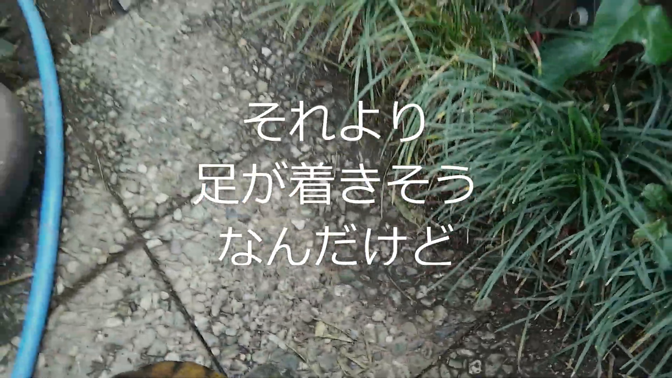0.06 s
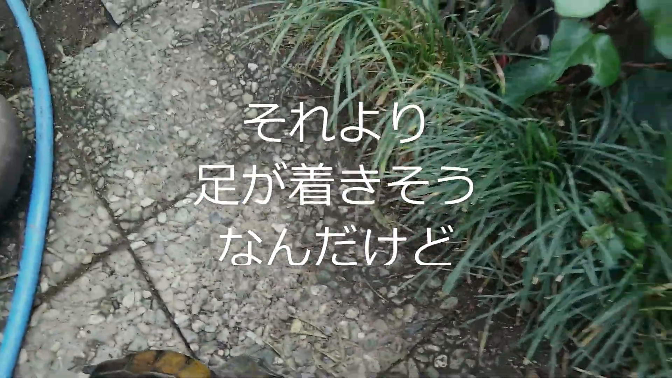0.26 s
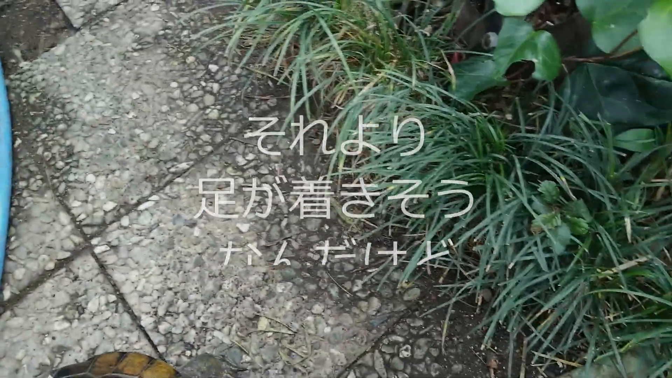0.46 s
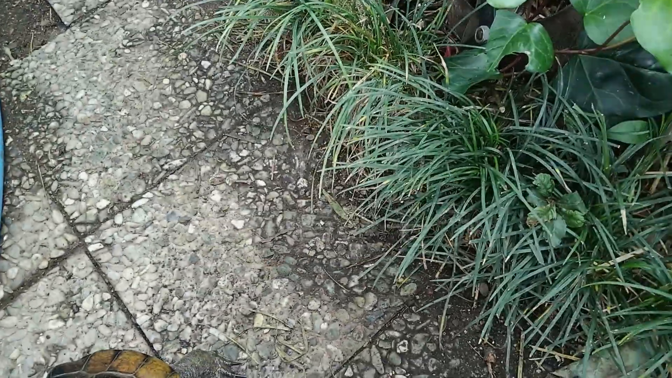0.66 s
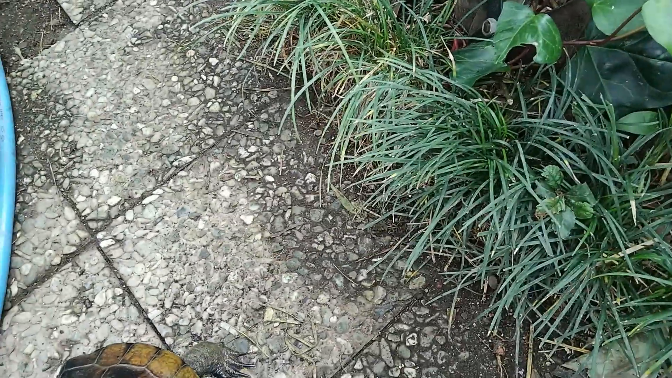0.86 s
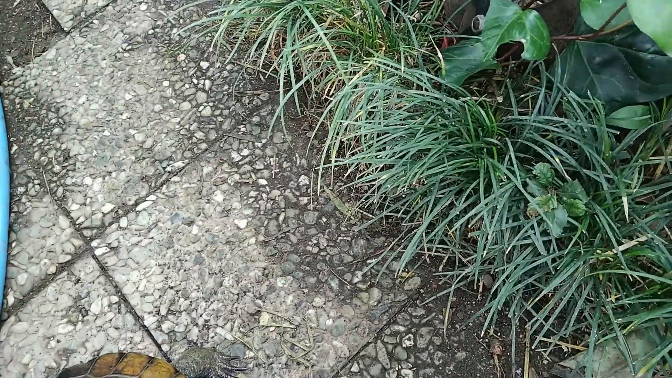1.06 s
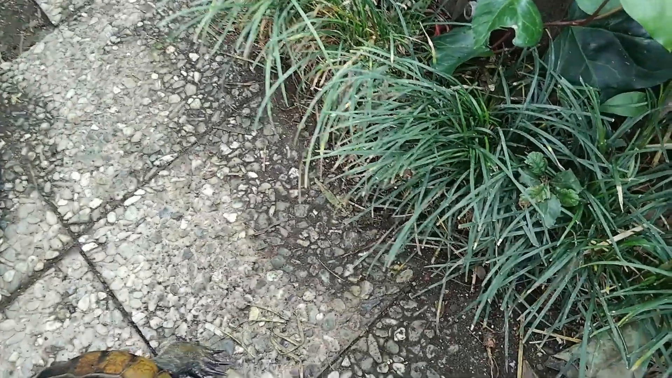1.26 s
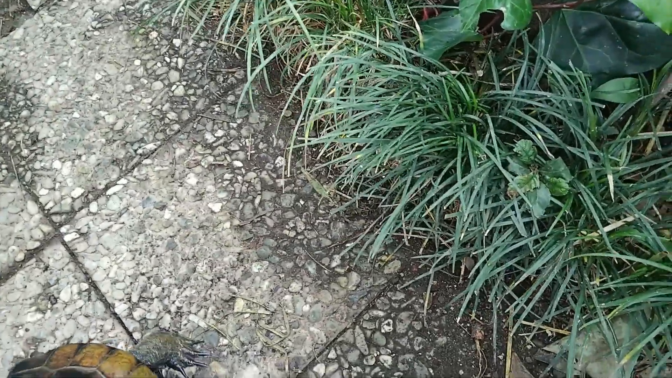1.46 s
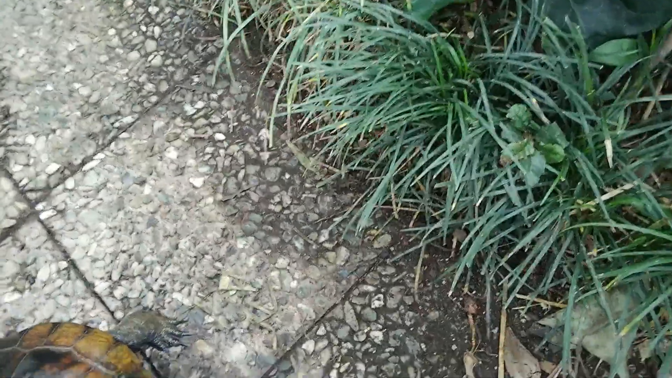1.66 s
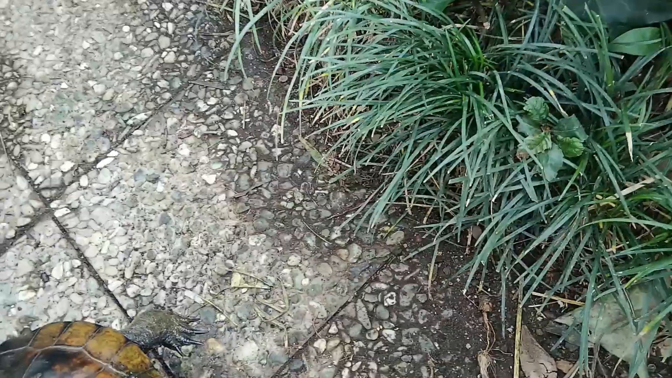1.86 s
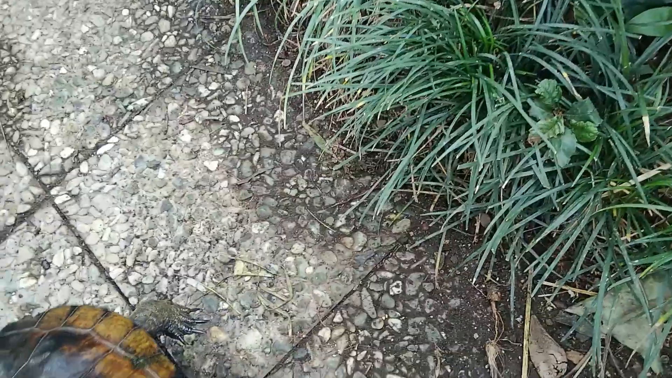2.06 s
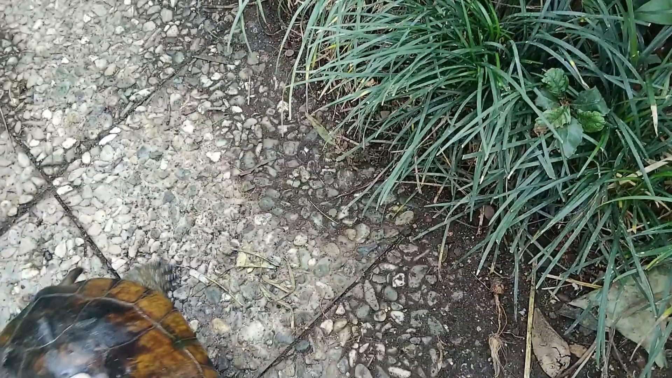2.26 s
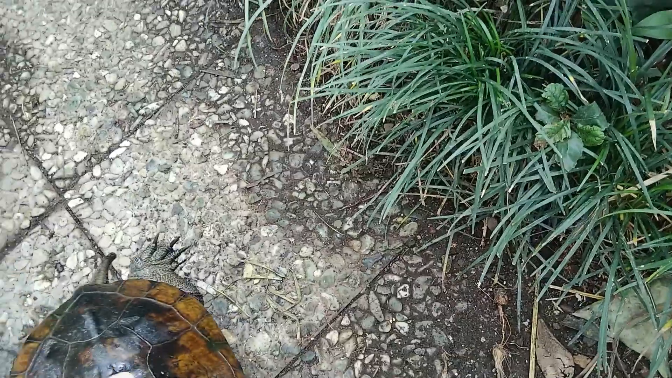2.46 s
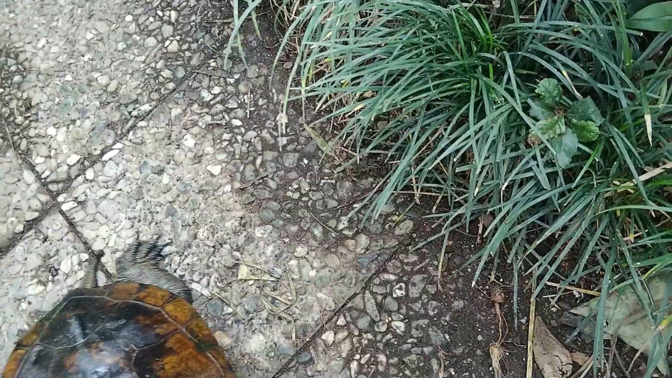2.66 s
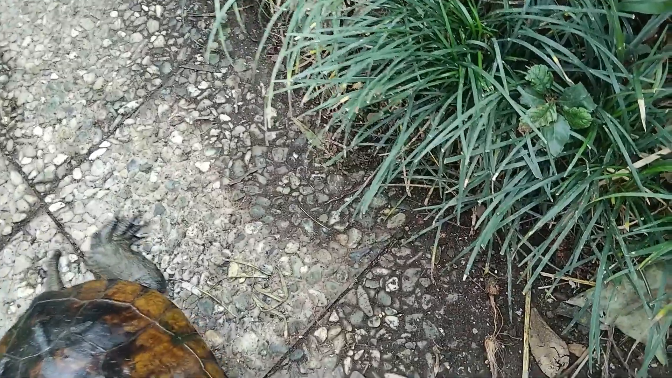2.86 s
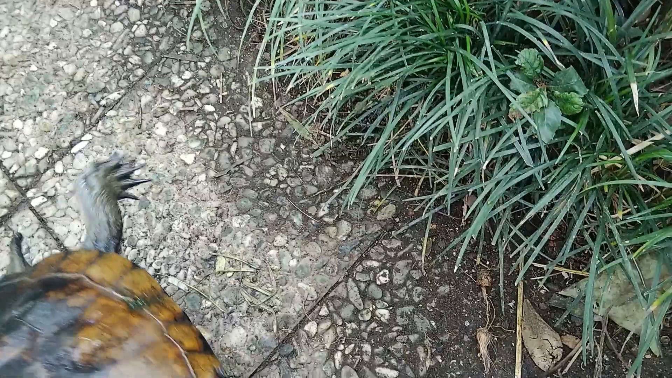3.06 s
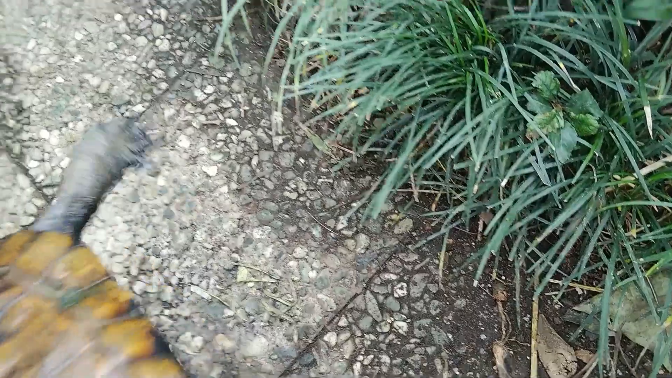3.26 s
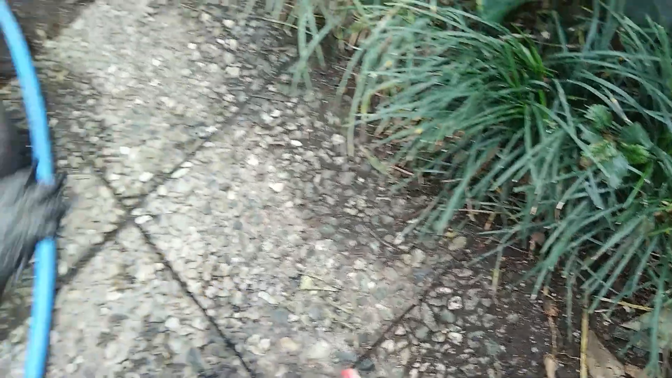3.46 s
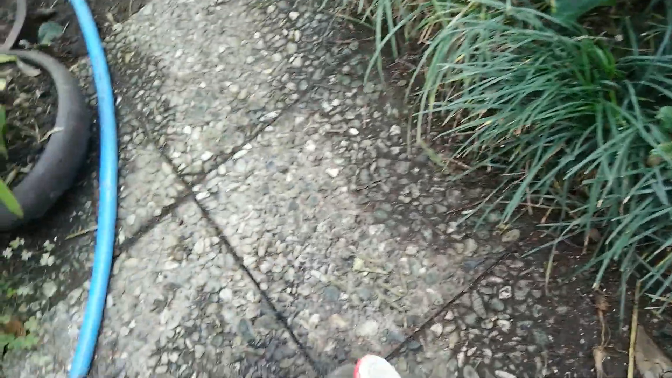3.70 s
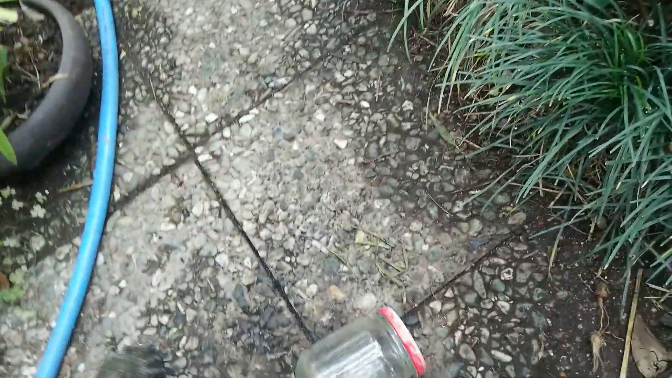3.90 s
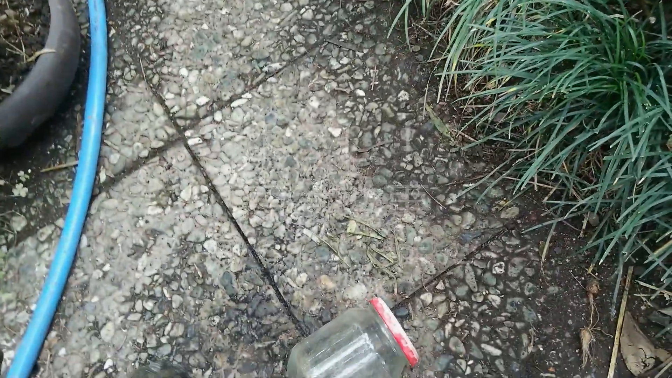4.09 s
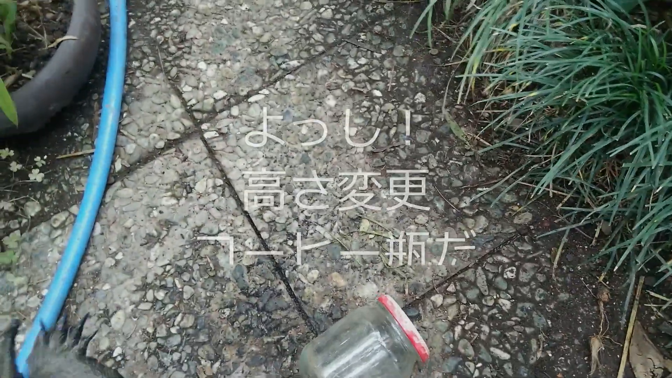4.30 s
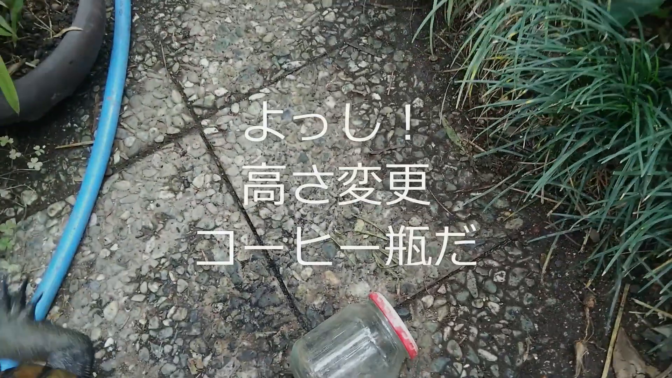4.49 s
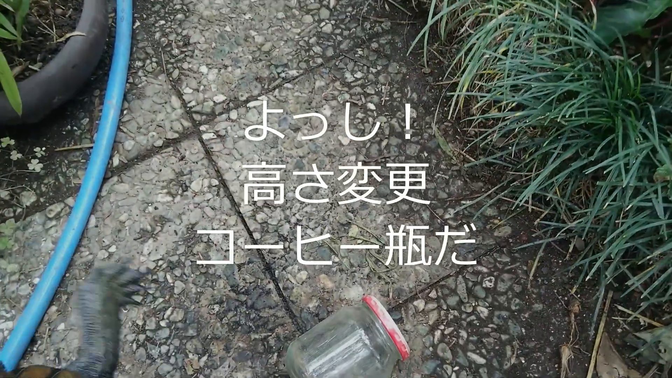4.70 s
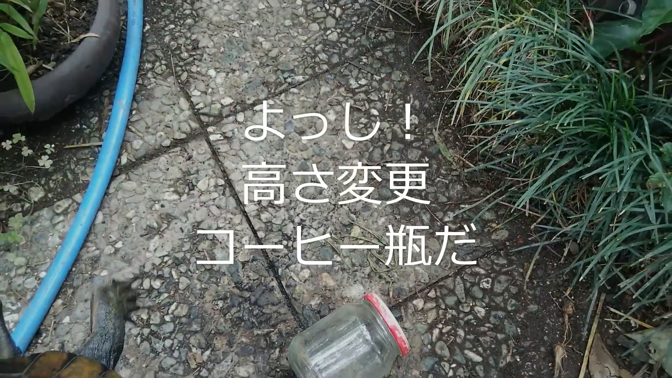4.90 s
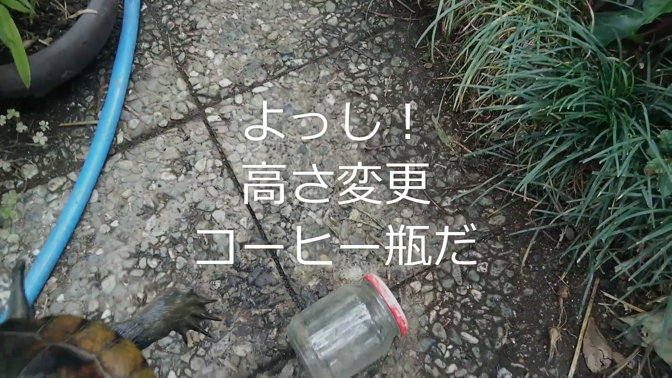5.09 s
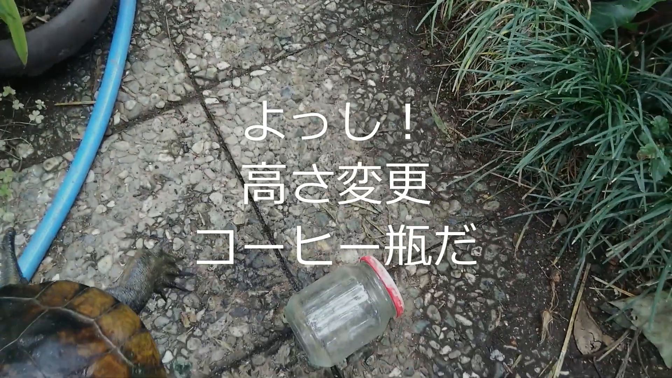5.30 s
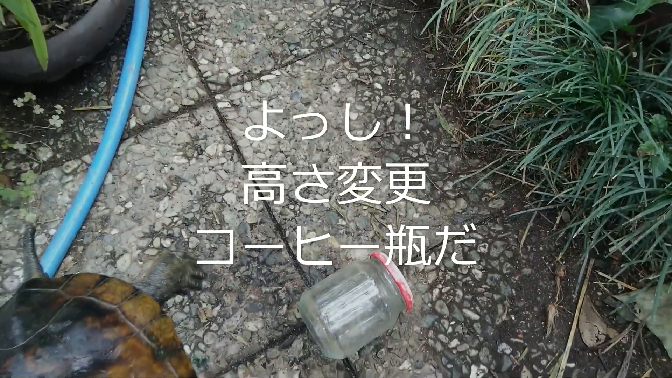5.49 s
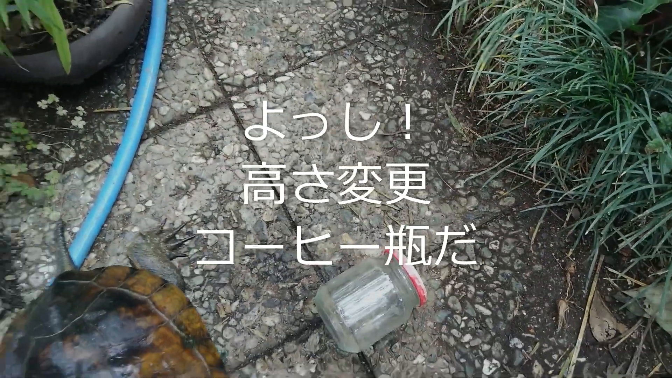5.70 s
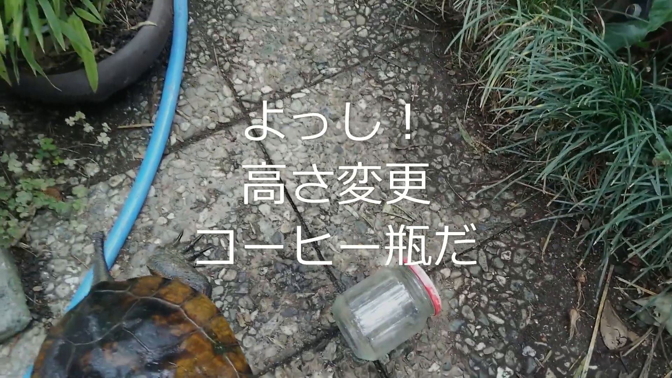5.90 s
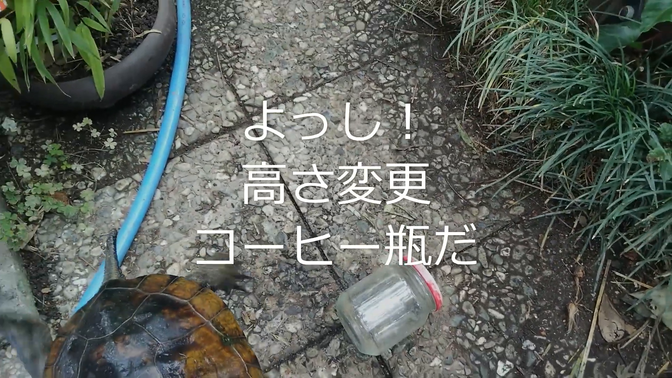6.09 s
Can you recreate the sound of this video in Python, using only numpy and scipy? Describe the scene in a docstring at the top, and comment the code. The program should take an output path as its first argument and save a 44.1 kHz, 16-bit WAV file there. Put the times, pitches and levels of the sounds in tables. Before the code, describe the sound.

A calm garden bed of soft hiss and low rumble, with a very faint steady motor hum and whine far off. At about 0.8 s a loud, hollow, woody-glassy knock lands close by, bouncing weakly within a tenth of a second, with faint touches and a scuff until 1.1. Then quiet, with one tiny tick near 1.6 and a bump and tick around 3.1. From 3.35 an empty glass jar touches, then clatters on stone: hard knocks at 3.42 and 3.47, a cluster at 3.6, a sharp one at 3.68. The level drops very briefly at 3.78, and the motor's tone shifts slightly. Knocks and clinks resume at 3.8, a crisp one at 4.0, fading into scrapes and light touches by 4.3. Soft scuffs follow; gritty ticks come at 5.9, then low handling bumps and a faint knock near 6.0. Short yard reflections.

```python
"""A jar tips over on garden paving

A hollow knock bounces, then an empty glass jar clatters, clinks and scrapes to rest on stone.
Blows are dying sines with noisy chatter; ticks, scrapes, soft thumps and bumps are shaped noise.
Outdoor hiss with a low rumble is noise too; a distant motor is a stack of faint sines.
The level dips briefly once, and the motor's balance of pitches changes there."""
import sys
import numpy as np
from scipy import signal
from scipy.io import wavfile
from scipy.ndimage import uniform_filter1d

SR = 44100
rng = np.random.default_rng(int(sys.argv[2]) if len(sys.argv) > 2 else 0)


def persist_wave(psi):
    """Save psi, clipped to +-1, as 16-bit WAV."""
    counts = np.round(np.clip(psi, -1, 1) * 32767).astype(np.int16)
    wavfile.write(sys.argv[1], SR, np.atleast_2d(counts).T)


N = 271126  # length in samples
DIP_S = 3.777  # middle of the brief dip in level


def gain_of(db):
    """Turn decibels into a factor for the wave."""
    return 10 ** (np.asarray(db) / 20)


def evened(x):
    """Scale to an average (RMS) strength of 1."""
    return x / np.sqrt(np.mean(x ** 2) + 1e-20)


def read(points, hz):
    """Read a curve of (pitch, value) points on a logarithmic pitch scale."""
    point_hz, value = np.transpose(points)
    return np.interp(np.log(hz + 1), np.log(point_hz + 1), value)


def add(mix, s, sound):
    """Lay a sound into the mix, starting at s seconds."""
    part = mix[round(s * SR):][:len(sound)]
    part += sound[:len(part)]


def band(x, lo_hz, hi_hz):
    """Keep the pitches between two limits, with gentle slopes outside."""
    limits = [lo_hz, min(hi_hz, SR / 2.2)]
    return signal.sosfilt(signal.butter(2, limits, "bandpass", fs=SR, output="sos"), x)


def ring(modes, tilt_db=0, spread_db=3.0, detune=0):
    """Dying sines; a hard blow favours the high modes, and each blow differs at random."""
    hz, db, t60 = np.transpose(modes)[..., None]
    t = np.arange(round(.25 * SR)) / SR
    draw = rng.standard_normal((2, *hz.shape))
    db = db + tilt_db * np.log2(hz / hz.mean()) + spread_db * draw[0]
    sines = np.sin(2 * np.pi * hz * (1 + detune * draw[1]) * t)
    return (gain_of(db - 60 * t / t60) * sines).sum(0)


def struck(sound, size):
    """The contact lasts a moment (size samples), which rounds the start; peak 1."""
    pushed = np.convolve(sound, np.hanning(size))[:len(sound)]
    return pushed / abs(pushed).max()


def swelling(sound, rise_s):
    """A struck body takes a moment to reach its full ring; peak 1."""
    rise = np.clip(np.arange(len(sound)) / SR / rise_s, 0, 1)
    grown = sound * np.sin(np.pi / 2 * rise) ** 2
    return grown / abs(grown).max()


def chatter(sound, grit_db, t60):
    """The body keeps chattering on the pebbles: dying noise strikes it again and again."""
    t = np.arange(round(.12 * SR)) / SR
    grit = rng.standard_normal(len(t)) * gain_of(-60 * t / t60) * np.clip(t / 0.0014, 0, 1)
    rattle = signal.fftconvolve(sound, grit / np.linalg.norm(grit))[:len(sound)]
    return sound + gain_of(grit_db) * rattle


def crack(decay_s):
    """The short wide snap of stone against a hard edge: fading noise."""
    t = np.arange(round(0.0089 * SR)) / SR
    return band(rng.standard_normal(len(t)), 3500, 7400) * np.exp(-t / decay_s)


def air():
    """Outdoor hiss and rumble: noise with drifting patches and a flicker, most in the treble."""
    # how strong the noise is at each pitch: pitch_hz [Hz], density_db [relative dB per Hz]
    air_colour = [(25, -34), (45, 7), (62, 10), (120, -9), (170, -9), (400, -9), (900, -9.5), (1200, -13.5),
                  (2400, -7), (3200, -13.5), (6500, -11.5), (8000, -26), (10500, -35), (16500, -40.5)]
    # slow swell of the hiss, in full only in the treble: time_s [s], swell_db [dB]
    air_swell = [(0.0, -1.1), (1.8, -1.1), (2.9, 0.6), (3.7, 1), (4.33, -1), (5.3, -0.4), (5.75, -3),
                 (6.04, 1.7), (6.15, 2)]
    level_db = -52.5
    frames, hz = N // 256 + 5, np.fft.rfftfreq(1024, 1 / SR)
    a, b, patches = rng.standard_normal((frames, 513, 3)).T
    # smooth across pitch, then across time
    patches = uniform_filter1d(uniform_filter1d(patches, size=16, axis=0), size=10, axis=1)
    patches = evened(patches)
    flicker = evened(uniform_filter1d(rng.standard_normal(frames), size=4))
    swell_db = np.interp(np.arange(frames) * 256 / SR, *np.transpose(air_swell))
    treble_share = np.clip(hz / 4500, .05, 1)[:, None]
    moving_db = 1.4 * patches + treble_share * (swell_db + 1.8 * flicker)
    field_db = read(air_colour, hz)[:, None] + moving_db
    noise = signal.istft((a + 1j * b) * gain_of(field_db), nperseg=1024, noverlap=768)[1][:N]
    return gain_of(level_db) * evened(noise)


def motor():
    """Steady faint sines whose strength wavers on the way through the air."""
    # lines of the motor, one of them a whine between the whole multiples:
    # multiple [times base_hz], before_db [dB before the dip], after_db [dB after its middle]
    motor_lines = [(1, -70, -66), (3, -77, -76), (4, -79, -76), (4.562, -73, -72), (8, -72, -84),
                   (9, -76, -80), (12, -77, -77), (13, -76, -82), (15, -80, -78), (18, -84, -75),
                   (20, -78, -78), (23, -75, -79), (24, -77, -77)]
    base_hz = 116.3
    multiple, before_db, after_db = np.transpose(motor_lines)[..., None]
    t, draw = np.arange(N) / SR, rng.random((3, *multiple.shape))
    db = np.where(t < DIP_S, before_db, after_db)
    waver_db = 3 * np.sin(2 * np.pi * ((.4 + draw[0]) * t + draw[1]))
    lines = np.sin(2 * np.pi * (multiple * base_hz * t + draw[2]))
    return np.sqrt(2) * (gain_of(db + waver_db) * lines).sum(0)


def bumps():
    """Low lumpy noise in the microphone while hands move; each bump swells and sinks."""
    # bumps of handling: peak_s [s], level_db [dB at that peak], length_s [s]
    bump_list = [(3.077, -47.5, 0.1), (3.44, -45, .14), (3.516, -42.5, 0.091), (3.631, -45, 0.16),
                 (3.822, -47, .07), (3.884, -52, .06), (4, -43, 0.096), (4.324, -58.5, 0.11),
                 (5.844, -57, 0.051), (5.951, -47, 0.11), (6.042, -47, 0.07), (6.116, -64, 0.036)]
    rise_share, drop_db = 0.51, 12  # part of the length before the peak; drop at either end
    t, lumps = np.arange(N) / SR, evened(band(rng.standard_normal(N), 52, 161))
    power = np.zeros(N)
    for s, level_db, length in bump_list:
        away = np.maximum((s - t) / rise_share, (t - s) / (1 - rise_share)) / length
        power += gain_of(level_db - drop_db * away) ** 2
    return lumps * np.sqrt(power)


def scrapes_and_thumps():
    """Short uneven noises: scrapes over the pebbles, and two low soft thumps near 250-280 Hz."""
    # noises: start_s [s], length_s [s], level_db [dB before the ends fade], centre_hz [Hz]
    short_noises = [(1.042, 0.053, -52.5, 670), (1.113, 0.034, -54.5, 5570), (3.952, 0.026, -46, 5430),
                    (4.227, 0.041, -41.5, 3750), (4.232, 0.039, -48, 1970), (4.311, 0.045, -48, 4570),
                    (4.534, 0.053, -55, 950), (4.555, 0.016, -51.5, 252), (5.356, 0.043, -53, 3520),
                    (5.499, 0.035, -53.5, 277), (5.944, 0.018, -49.5, 4470), (6.071, 0.027, -47, 5000)]
    out = np.zeros(N)
    for s, length, level_db, hz in short_noises:
        draw = rng.standard_normal((2, round(.1 * SR)))[:, :round(length * SR)]
        unevenness_db = 3.0 * evened(uniform_filter1d(draw[1], size=50))
        uneven = draw[0] * gain_of(unevenness_db)
        fades = signal.windows.tukey(len(uneven), .6)
        add(out, s, gain_of(level_db) * evened(band(uneven, hz / 1.32, hz * 1.27)) * fades)
    return out


def ticks():
    """Claws and grit on stone: each tick is a few milliseconds of noise around its pitch."""
    # ticks: start_s [s], peak_db [dB], pitch_hz [Hz]
    tick_list = [(1.625, -38.5, 2520), (3.149, -39.5, 4070), (3.512, -25.5, 4600), (3.9305, -40, 2600),
                 (3.958, -34.5, 2320), (5.8531, -39.5, 5540), (5.8674, -37.5, 4320), (5.884, -30, 6300),
                 (5.905, -30.5, 6400), (5.975, -44, 4400), (5.988, -42, 4300)]
    out, t = np.zeros(N), np.arange(round(.02 * SR)) / SR
    for s, peak_db, hz in tick_list:
        tick = band(rng.standard_normal(len(t)) * np.exp(-t / 0.0017), hz / 1.087, hz * 1.07)
        add(out, s, gain_of(peak_db) * tick / abs(tick).max())
    return out


def knock():
    """Hollow knocks and bounces; the weakest touches stay in contact, so they ring shorter."""
    # blows: start_s [s], strength_db [dB], hardness_db [dB per octave of tilt to the treble],
    # grit_db [dB of chatter relative to the body], edge_db [dB relative to the hollow ring]
    knock_list = [(0.794, -1.5, -1.5, -16, -21.5), (0.845, -15, -4, -27, -10.5), (0.856, -17, -7, -13, -31),
                  (0.985, -33, -7, -2.5, -26), (1.073, -36, -23, -13.5, -29), (6.038, -30.5, -4, -3, -21)]
    # ring of the hollow body: pitch_hz [Hz], level_db [relative dB], t60_s [s, for a strong blow]
    hollow_modes = [(352, -10, 0.023), (666, -40, 0.027), (710, -17, 0.15), (778, -3.5, 0.093),
                    (848, -1, 0.055), (942, -3.5, 0.035), (1073, -3, 0.017), (1353, -3, 0.079),
                    (1555, 0.5, 0.015), (1785, 12.5, 0.0098), (1976, -3, 0.0084), (2210, 7.5, 0.019),
                    (2497, 0, 0.1), (2660, -23, 0.14), (2900, -7.5, 0.18)]
    # ring of its thin edge: pitch_hz [Hz], level_db [relative dB], t60_s [s to fall by 60 dB]
    edge_modes = [(3820, -5.5, 0.038), (3945, 2.5, 0.022), (4820, -14, 0.069), (5720, -13, 0.033),
                  (6300, -21, 0.22), (8600, -18.5, 0.041), (10000, -20, 0.055)]
    damp_below_db, damp_per_db = -29, 0.5  # share of the ring time lost per dB below that level
    out = np.zeros(N)
    for s, strength_db, tilt_db, grit_db, edge_db in knock_list:
        ring_share = np.clip(1 + damp_per_db * (strength_db - damp_below_db), .15, 1)
        hollow = ring(np.multiply(hollow_modes, [1, 1, ring_share]), tilt_db)
        body = swelling(struck(hollow, size=18), 0.00066)
        body = body + gain_of(edge_db) * swelling(ring(edge_modes), 0.00019)
        add(out, s, gain_of(strength_db) * chatter(body, grit_db, 0.066))
        add(out, s, gain_of(strength_db + edge_db - 9) * crack(0.0061))
    return out


def jar():
    """Every contact thuds in the belly and sets shoulder, wall, neck and rim ringing."""
    # jar on stone: start_s [s], strength_db [dB], hardness_db [dB per octave of tilt to the treble],
    # shoulder_db and clink_db [dB relative to the belly], spot [0 foot, 1 mouth, beyond it the lid]
    contacts = [(3.348, -26.5, -12.5, -35, -46, .4), (3.38, -25, -13, -36, -38, .12),
                (3.387, -33, 3, -24, -31, .2), (3.419, -7, -0.7, -16, -29, 0.34),
                (3.47, -8, 1, -2.5, -17, .05), (3.58, -15.5, -9.5, -7.5, -28, .1),
                (3.59, -23.5, -17, -13, -24, .02), (3.615, -9.5, -8, -10.5, -38, .2),
                (3.624, -11, 0, -14, -31, 0.2), (3.635, -21.5, -1.5, -13, -18, 0.37),
                (3.678, -4.5, 11.5, -16, -44, .1), (3.807, -11.5, -3.5, -17, -29.5, 0.93),
                (3.875, -23.5, -10, -5, -12, 0.64), (3.893, -24.5, -14.5, -10, -35, .65),
                (3.929, -28.5, -2, -5, -23, .2), (3.982, -20, -13, -13.5, -28, .8),
                (3.995, -10.5, 25, -13.5, -33.5, .66), (4.007, -22.5, -3.5, -29, -37, .1),
                (4.013, -20.5, -14, -20, -39, 0.92), (4.074, -33, -19, -13, -18.5, 0.61),
                (4.082, -33.5, -8, -8, -22, 1.2), (4.106, -27, -16.5, -14, -46, 0.82),
                (4.129, -32.5, -18, -14, -22, 0.64), (4.245, -29.5, -15, -1, -35, 1.47),
                (4.264, -30, -16, -2.5, -32, .1), (4.709, -39, -14, -7, -31, .7)]
    # Ringing parts of the jar, each: pitch_hz [Hz], level_db [relative dB], t60_s [s to fall by 60 dB]
    # the belly touches the stone and dies fast
    belly_modes = [(373, -28, 0.0064), (697, -15.5, 0.011), (885, 1.5, 0.012), (1154, 0.5, 0.009),
                   (1400, 2.5, 0.011), (1644, 6.5, 0.012), (1920, 14, 0.011), (2206, 11.5, 0.017),
                   (2430, 4.5, 0.015)]
    # the shoulder
    shoulder_modes = [(3750, -11.5, 0.031), (3896, 13.5, 0.025), (3950, 2, 0.018), (4700, -1.5, 0.02),
                      (5050, -3.5, 0.019), (5700, -16, 0.011)]
    # the glass wall
    wall_modes = [(6655, -1, .06), (6908, 0, .07)]
    # the neck
    neck_modes = [(8310, 0, .048), (8590, -8, .03), (8950, -9, .02)]
    # the rim of the mouth
    rim_modes = [(9950, -15, .03), (11250, -10, .03), (11770, 0, .06), (11885, -2, .065),
                 (13760, -14, .025), (14800, -11, .025), (15690, -5, .045)]
    rim_reach_db = 26  # the rim rings this much less for a blow at the foot than at the mouth
    # the neck rings most when struck at its spot, less per jar length away, down to a least
    neck_spot, neck_reach_db, neck_least_db = 0.366, 39, -11
    paving_share = 0.47
    out = np.zeros(N)
    for s, strength_db, tilt_db, shoulder_db, clink_db, spot in contacts:
        # the belly's pitches vary a little at random from contact to contact
        belly = ring(belly_modes, tilt_db, spread_db=5.0, detune=0.051)
        belly = swelling(struck(belly, size=16), 0.00063)
        shoulder = struck(ring(shoulder_modes, spread_db=2.5, detune=0.027), size=8)
        thud = belly + gain_of(shoulder_db) * shoulder
        neck_db = max(-neck_reach_db * abs(spot - neck_spot), neck_least_db)
        rim_db = rim_reach_db * (spot - 1)
        clink = 0
        for part_db, modes in ((0, wall_modes), (neck_db, neck_modes), (rim_db, rim_modes)):
            clink = clink + gain_of(clink_db + part_db) * swelling(ring(modes, spread_db=4.5), 0.00072)
        grit_db = max(-9.5 - 0.68 * tilt_db, -7.5)  # soft, glancing contacts chatter more
        contact = chatter(thud, grit_db, 0.051) + chatter(clink, -2.5, 0.055)
        add(out, s, gain_of(strength_db) * contact)
        add(out, s, gain_of(strength_db + shoulder_db - 18) * crack(0.0015))
    # the stone mirrors the sound a few centimetres later, which hollows it near 3 kHz
    return out + paving_share * np.roll(out, shift=round(SR / 6200))


def yard(x):
    """A near wall answers once; pots and leaves scatter the rest as low and high dying noise."""
    t = np.arange(round(.4 * SR)) / SR
    taps = rng.standard_normal((2, len(t))) * np.clip(t / 0.0048, 0, 1)
    low = band(taps[0], 170, 1520) * gain_of(-60 * t / 0.18)
    high = band(taps[1], 4200, 14600) * gain_of(-60 * t / 0.22)
    tail = low + 0.66 * high
    out = gain_of(-15) * signal.fftconvolve(x, tail / np.linalg.norm(tail))[:N]
    # the wall's echo covers only the first three quarters of the sound
    add(out, .0152, gain_of(-19.5) * band(x, 270, 3700)[:N // 4 * 3])
    return out


def scene():
    """The near sounds with their answer from the yard, over the background."""
    blows = band(band(jar() + knock(), 305, 20000), 90, 20000)  # small bodies radiate little bass
    near = blows + ticks() + scrapes_and_thumps()
    return (near + yard(near) + bumps() + motor() + air())[None]


def record(dry):
    """The microphone drops the deepest bass; then the brief dip in level and the treble limit."""
    dip_db, fade_s, treble_limit_hz = -32, 0.029, 15900
    fade_db = dip_db * np.maximum(1 - abs(np.arange(N) / SR - DIP_S) / fade_s, 0)
    faded = band(band(dry, 39, 20000), 39, 20000) * gain_of(fade_db)
    treble_limit = signal.firwin(511, treble_limit_hz, window=("kaiser", 9), fs=SR)
    return signal.oaconvolve(faded, treble_limit[None], "same")


dry = scene()
out = record(dry)
persist_wave(out)
```